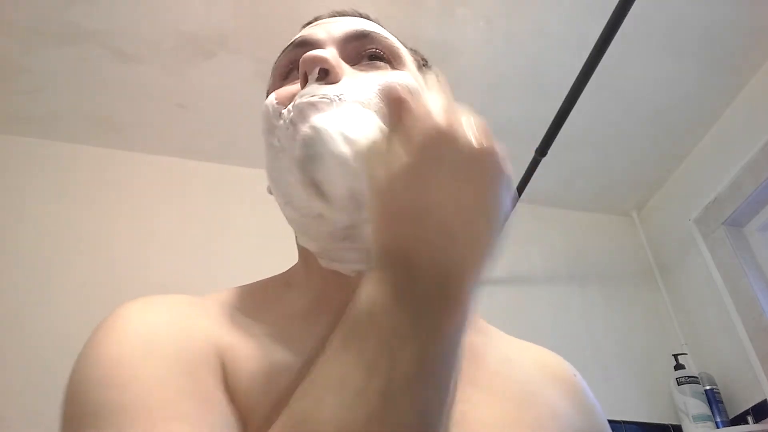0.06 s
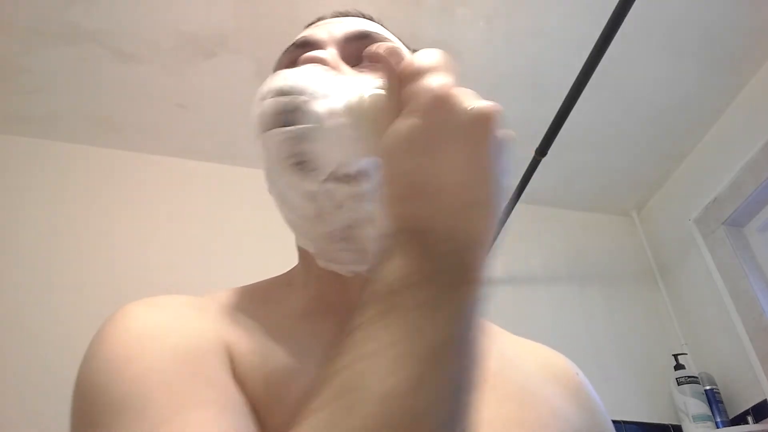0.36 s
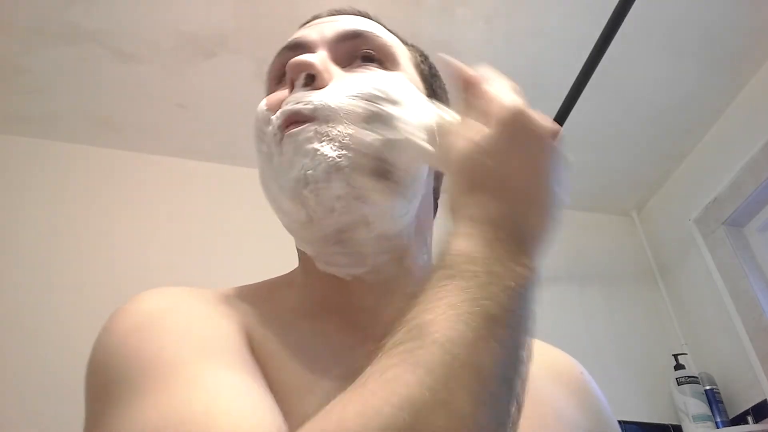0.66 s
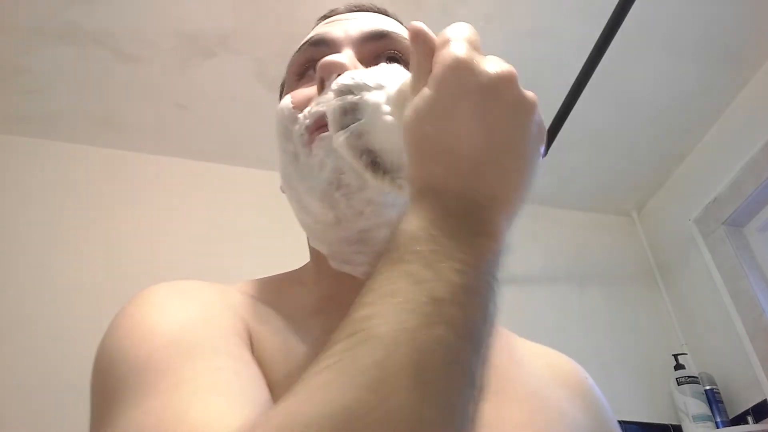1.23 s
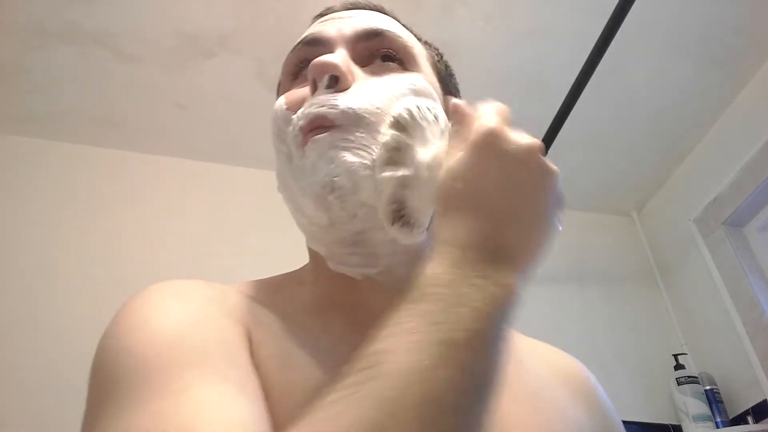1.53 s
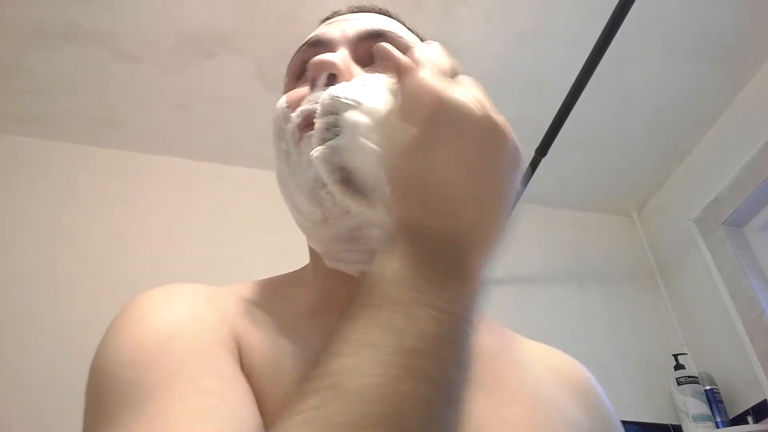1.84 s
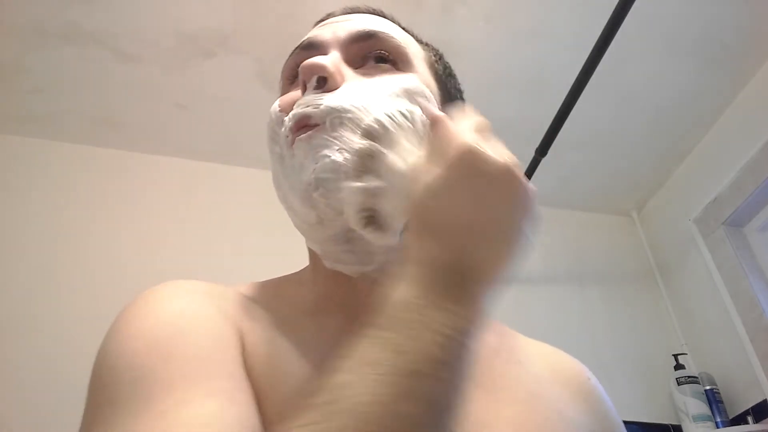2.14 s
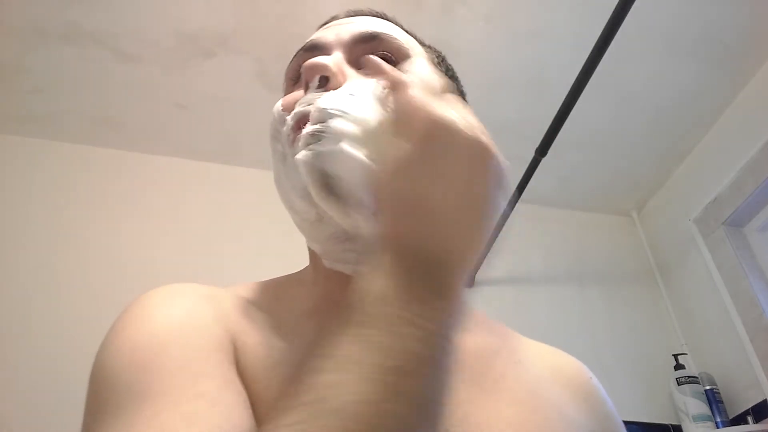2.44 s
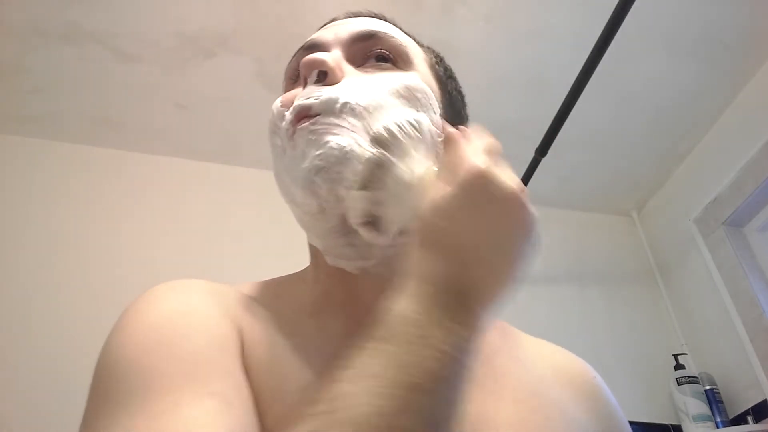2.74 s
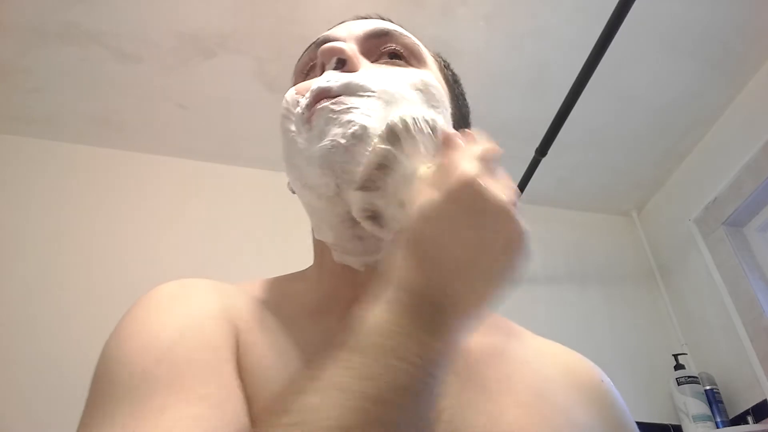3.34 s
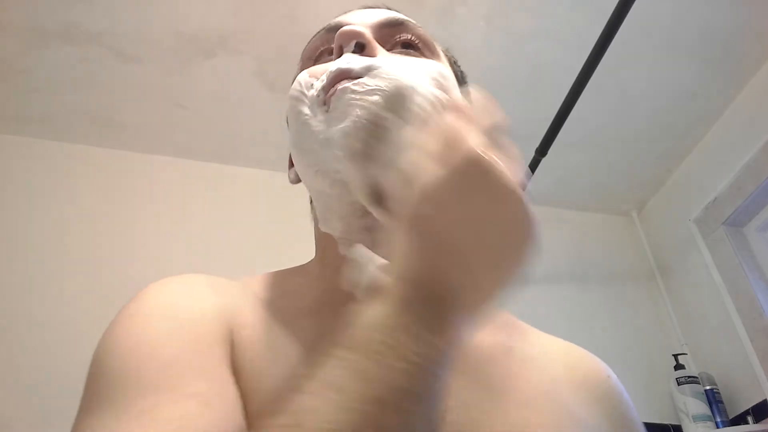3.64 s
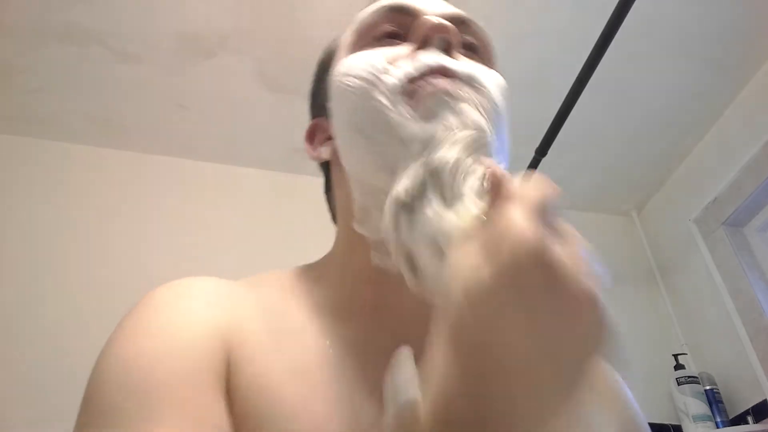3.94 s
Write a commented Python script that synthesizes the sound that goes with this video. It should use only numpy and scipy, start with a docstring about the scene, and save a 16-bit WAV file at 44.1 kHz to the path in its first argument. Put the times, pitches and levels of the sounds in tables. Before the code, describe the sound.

Rapid, hissing swishes of a shaving brush work wet foam over a cheek, with tiny bubble pops and soft pats. Late on there is one brief, juddering bump. The small bathroom rings faintly over a quiet hiss and fan drone.

```python
"""In a small bathroom, a shaving brush scrubs lather over a stubbly cheek, about a dozen swishes a second.
The bristles hiss as they flick over the stubble, the foam squelches and crackles as its bubbles burst,
and pockets of air plop. Near the end comes a dull, juddering bump. The room rings faintly around
everything, over a quiet hiss and the drone of a fan."""
import sys
import numpy as np
from scipy import signal
from scipy.fft import rfft, irfft
from scipy.io import wavfile

SR = 44100
rng = np.random.default_rng(int(sys.argv[2]) if len(sys.argv) > 2 else 0)


def unload_wav(signal):
    """Save mono or channel-first audio to the path in sys.argv[1] as 16-bit WAV at rate SR, clipped to [-1, 1]."""
    wavfile.write(
        sys.argv[1],
        SR,
        np.round(np.clip(np.atleast_2d(signal).T, -1, 1) * 32767).astype(np.int16),
    )


N = 176400
TIME = np.arange(N) / SR

# strokes of the brush: peak t/s, rise/s, fall/s, hiss level/dB, squelch level/dB, brightness/dB
BRUSH_SWISHES = [(0.016, 0.069, 0.073, -71.5, -75.5, -4), (0.172, 0.017, 0.022, -62.5, -64.5, -1),
                 (0.242, 0.038, 0.082, -66, -71, -9), (0.359, 0.012, 0.033, -69, -76, 8),
                 (0.409, 0.032, 0.039, -64, -68.5, 0), (0.498, 0.024, 0.053, -66, -73, -10),
                 (0.607, 0.011, 0.02, -74, -75, -7), (0.682, 0.046, 0.017, -59.5, -64, -1.5),
                 (0.744, 0.033, 0.046, -56.5, -59, -9), (0.862, 0.039, 0.076, -67, -63, -6),
                 (1.008, 0.035, 0.026, -66.5, -62, -9.5), (1.134, 0.031, 0.04, -64.5, -57.5, -3),
                 (1.22, 0.036, 0.049, -67, -63.5, -3), (1.328, 0.027, 0.038, -60.5, -60.5, -9),
                 (1.401, 0.024, 0.036, -65, -59.5, -6), (1.43, 0.018, 0.031, -73, -61.5, 1),
                 (1.526, 0.028, 0.011, -54.5, -54, -8), (1.598, 0.1, 0.054, -63, -61, -6),
                 (1.711, 0.031, 0.044, -54, -57, -3.5), (1.801, 0.053, 0.028, -59, -59.5, 0),
                 (1.915, 0.043, 0.052, -57, -61.5, 2), (1.982, 0.0052, 0.035, -57.5, -55, 8),
                 (2.024, 0.036, 0.012, -67.5, -64, -7), (2.105, 0.046, 0.059, -57, -56, 0.5),
                 (2.181, 0.0043, 0.034, -56.5, -57, 8.5), (2.302, 0.039, 0.045, -61.5, -56, -2.5),
                 (2.369, 0.005, 0.067, -60.5, -61, 0), (2.51, 0.035, 0.021, -60, -57, 2.5),
                 (2.611, 0.05, 0.022, -59.5, -61.5, -3), (2.655, 0.005, 0.051, -57.5, -64, 5),
                 (2.695, 0.013, 0.035, -55, -53.5, -2), (2.805, 0.068, 0.026, -61, -59.5, -0.5),
                 (2.92, 0.046, 0.024, -56, -57.5, -2), (2.985, 0.006, 0.06, -54.5, -55, 2.5),
                 (3.09, 0.018, 0.033, -52.5, -55.5, 0), (3.122, 0.019, 0.034, -55, -54, -3.5),
                 (3.178, 0.004, 0.055, -54, -55.5, 0.5), (3.257, 0.0089, 0.008, -60, -60.5, 8),
                 (3.331, 0.054, 0.029, -55.5, -58, -4.5), (3.392, 0.012, 0.06, -48.5, -44, -1.5),
                 (3.483, 0.018, 0.016, -49.5, -48.5, -2), (3.508, 0.011, 0.016, -40, -41.5, -2),
                 (3.608, 0.014, 0.018, -52, -55.5, -5.5), (3.709, 0.041, 0.01, -50, -53.5, -3),
                 (3.767, 0.032, 0.043, -57.5, -56.5, -6), (3.894, 0.048, 0.028, -59.5, -67.5, 0),
                 (3.966, 0.0068, 0.039, -64, -66.5, -16)]


def bristles():
    """Bristle tips flick over stubble, so many tiny clicks that they hiss, over a faint high hiss."""
    hiss_spectrum = [(700,-16),(1400,-16),(1800,1.5),(2200,-6),(2700,0),(4300,1),(5400,0),(6400,-5),(7400,-19),(10000,-21),(12500,-42),(16000,-35)]  # tone of the bristles: f/Hz, level/dB
    high_hiss_spectrum = [(3000,2),(5000,-12),(7500,-1),(10000,-1),(12500,-9),(16000,-2.5)]  # tone of the high background hiss: f/Hz, level/dB
    split_hz, flutter_db, linger_s = 3570, 1.5, 0.77
    clicks = colour(stereo_grains(per_s=9000, spread_db=3, shared=0.19), hiss_spectrum)
    lows = signal.sosfiltfilt(signal.butter(2, split_hz, fs=SR, output="sos"), clicks)
    highs = clicks - lows
    # a brighter swish has less of the lows and more of the highs
    low_level = swells([(s, rise, fall, db - bright / 2)
                        for s, rise, fall, db, _, bright in BRUSH_SWISHES])
    high_level = swells([(s, rise, fall, db + bright / 2)
                         for s, rise, fall, db, _, bright in BRUSH_SWISHES])
    # a faint high background hiss slowly rises and fades with the brushing's loudness
    hold = np.exp(-1 / (linger_s * SR))
    high_hiss_level = signal.lfilter([1 - hold], [1, -hold], (low_level + high_level) / 2)
    high_hiss = high_hiss_level * colour(rng.standard_normal((2, N)), high_hiss_spectrum)
    flutter = from_db(flutter_db * drift(rate_hz=69))
    return flutter * (low_level * lows + high_level * highs) + from_db(-13) * high_hiss


def foam_squelch():
    """Squeezed lather squelches as clumps of bubbles collapse."""
    spectrum = [(60,-26),(120,-5),(190,-4),(320,-4.5),(470,8),(570,-2),(680,4.5),(860,2.5),(1100,3),(1500,-5.5),(2200,-24),(4000,-29.5)]  # tone of the squelch: f/Hz, level/dB
    gain_db, flutter_db = 0.5, 1
    level = swells([(s, rise, fall, db) for s, rise, fall, _, db, _ in BRUSH_SWISHES])
    bubbles = colour(stereo_grains(per_s=2500, spread_db=2.5, shared=0.64), spectrum)
    return level * from_db(gain_db + flutter_db * drift(rate_hz=44)) * bubbles


def foam_crackle():
    """Small bubbles tick one by one as each swish crushes them."""
    spectrum = [(600,-18),(1500,-7),(3000,-1),(5500,-3.5),(6600,-6.5),(7500,-20),(16000,-43)]  # tone of the ticks: f/Hz, level/dB
    level = swells([(s, rise, fall, db) for s, rise, fall, db, _, _ in BRUSH_SWISHES])
    return from_db(-10) * level * colour(grains(per_s=350, spread_db=2), spectrum)


def foam_hollows():
    """Each swish sets two hollows in the foam singing briefly, each at a random pitch."""
    typical_hz, spread_octaves, half_width_octaves, gain_db = 2200, 0.359, 0.027, -11.5
    out, t = np.zeros(N), TIME[:SR // 4]
    for s, rise, fall, db, _, bright in BRUSH_SWISHES:
        start = max(s - 2 * rise, 0)
        from_peak = start + t - s
        swell = np.exp(-(from_peak / np.where(from_peak < 0, rise, fall)) ** 2)
        for hz in typical_hz * 2 ** (spread_octaves * rng.normal(size=2)):
            edges_hz = [hz * 2 ** -half_width_octaves, hz * 2 ** half_width_octaves]
            note = rms_one(filtered(rng.standard_normal(len(t)), "band", edges_hz, order=1))
            add(out, start, from_db(db + gain_db - bright / 2) * note * swell)
    return out


def air_plops():
    """An air pocket opens and rings briefly and roughly, with overtones that differ each time."""
    pockets = [(0.145,-61,502,.003),(.752,-49,502,0.0074),(1.0,-77,460,0.0027),(1.127,-43,473,.006),(1.214,-68,490,0.0026),(1.319,-51.5,500,0.0023),(1.516,-46.5,500,0.0061),(1.723,-35.5,457,0.0021),(1.776,-43,499,0.0038),(1.908,-37,473,0.0018),(1.976,-44,419,0.00069),(2.028,-52,488,0.0018),(2.112,-46.5,475,0.0048),(2.177,-43,467,.002),(2.293,-52,496,0.0033),(2.371,-42,456,.004),(2.495,-44,480,0.0077),(2.696,-49,443,0.0013),(2.98,-49.5,430,0.0007),(3.177,-39.5,492,0.0017),(3.334,-50,481,0.0012),(3.604,-39.5,494,0.002),(3.763,-43,500,0.006)]  # air pockets under the brush: t/s, level/dB, f/Hz, fade-in/s
    tones = [(.72,-19,0.013),(0.998,3.5,0.064),(1.36,1,0.035),(1.81,-8.5,.05),(2.5,-27,0.016)]  # how a pocket rings: multiple of its pitch, level/dB, ring time/s
    roughness_db = 4.5
    out = np.zeros(N)
    for s, db, hz, fade_in_s in pockets:
        plop = 0
        for multiple, tone_db, ring_s in tones:
            detune = 1 + 0.13 * (multiple - 1) * rng.normal()
            plop += ring(hz * multiple * detune, db + tone_db + rng.normal(), ring_s)
        fade_in = 1 - np.exp(-TIME[:len(plop)] / fade_in_s)
        boost = from_db(350 * fade_in_s)  # makes up for what a slow fade-in takes away
        add(out, s, plop * fade_in * boost)
    return out * from_db(roughness_db * (drift(rate_hz=81) - 1))


def bubble_snaps():
    """A larger bubble bursts with a short, bright snap."""
    bursts = [(.148,-64,1290),(0.237,-52,2430),(1.113,-60,1100),(1.132,-55.5,2740),(1.32,-64,1110),(1.722,-45.5,860),(1.909,-49,905),(1.978,-51.5,2200),(2.179,-58,870),(2.366,-55,4300),(2.653,-59,3380),(2.982,-58,2950),(3.602,-49,3300),(3.959,-49.5,1440)]  # single bursting bubbles: t/s, level/dB, f/Hz
    decay_s, half_width_octaves = 0.007, 0.48
    out, t = np.zeros(N), TIME[:SR // 10]
    fade = np.exp(-t / decay_s)
    for s, db, hz in bursts:
        edges_hz = [hz * 2 ** -half_width_octaves, hz * 2 ** half_width_octaves]
        snap = filtered(rng.standard_normal(len(t)) * fade, "band", edges_hz, order=2)
        add(out, s, from_db(db) * snap * np.linalg.norm(fade) / np.linalg.norm(snap))
    return out


def hollow_note():
    """A soft, wavering note comes and goes under the brush in the first second."""
    notes = [(.535,.04,0.054,-68),(.612,0.022,0.02,-64.5),(.76,.025,0.013,-60)]  # swells of the note: peak t/s, rise/s, fall/s, level/dB
    pitch_hz, waver_hz = 491, 15
    hz = pitch_hz + waver_hz * drift(rate_hz=40)
    return swells(notes) * np.sin(2 * np.pi * np.cumsum(hz) / SR)


def cheek_pats():
    """The brush pats the cheek, which answers with a soft, low thud."""
    pats = [(1.143,-69),(1.977,-52.5),(2.003,-51),(2.179,-43.5),(2.204,-61),(2.226,-61),(2.285,-57),(2.318,-51),(2.695,-56),(2.982,-53),(3.18,-56)]  # pats of the brush: t/s, level/dB
    tones = [(190,-5.5,0.21),(256,-4.5,0.11)]  # how the cheek rings: f/Hz, level/dB, ring time/s
    return knocks(pats, tones)


def bump():
    """A quick run of dull jolts over a rubbing rumble."""
    jolts = [(3.382,-38),(3.392,-27.5),(3.406,-32),(3.421,-23.5),(3.456,-36),(3.474,-30.5),(3.503,-51),(3.521,-64),(3.553,-58),(3.81,-54.5)]  # jolts of the bump: t/s, level/dB
    tones = [(63,-20.5,0.32),(121.7,-5,0.24),(187.7,-3.5,0.076),(218.2,-4,0.133),(265,-14,0.023),(380,-10.5,0.095)]  # how a jolt rings: f/Hz, level/dB, ring time/s
    rumbles = [(3.392,0.008,0.091,-37.5),(3.49,0.02,0.076,-45.5)]  # swells of the rumble: peak t/s, rise/s, fall/s, level/dB
    spectrum = [(30,-17),(85,-22),(130,13),(250,-1),(320,-8),(420,-4.5),(600,-5),(1000,-14),(2000,-63)]  # tone of the rumble: f/Hz, level/dB
    return knocks(jolts, tones) + swells(rumbles) * colour(rng.standard_normal(N), spectrum)


def bathroom(sound):
    """Sound bounces off the walls, differently for each ear, and a few notes ring on between them."""
    room_notes = [(116.2,-2,0.69),(207,-6.5,0.18),(390,-21,0.22),(477,-0.5,0.12),(500,1.5,0.37),(640,-9,0.18),(826,-23,0.3),(847.7,5,0.12)]  # standing waves between the walls: f/Hz, level/dB, ring time/s
    scatter_s, scatter_db, tail_s, tail_db = 0.00053, -2, 0.35, -6.5
    t = TIME[:SR // 2]

    def echoes(fade, above_hz, order):
        """A dense cloud of echoes: fading noise with the bass taken out."""
        noise = rng.standard_normal((2, len(t)))
        return filtered(noise * fade / np.linalg.norm(fade), "high", above_hz, order)

    direct = t == 0
    scatter = echoes(np.exp(-t / scatter_s), above_hz=500, order=2)  # off the nearest walls
    early_spectrum = rfft(direct + from_db(scatter_db) * scatter)
    early = irfft(early_spectrum / np.abs(early_spectrum), len(t)) * (t < 0.1)  # no pitch is favoured
    tail_fade = from_db(-60 * t / tail_s) * (1 - np.exp(-t / 0.01))
    response = early + from_db(tail_db) * echoes(tail_fade, above_hz=300, order=1)
    for hz, db, ring_s in room_notes:
        # scaled so that db is the gain at the note's own pitch
        response += np.gradient(ring(hz, db, ring_s)) * np.log(1000) / (np.pi * hz * ring_s)
    return signal.fftconvolve(sound, response, axes=1)[:, :N]


def room_tone():
    """A faint, steady hiss and a fan's hollow drone, which is noise in a narrow band."""
    spectrum = [(20,-9),(45,-3.5),(85,-8.5),(125,0),(200,-5.5),(340,-11.5),(480,-9),(700,0),(1200,-6),(3000,-8.5),(6000,-12.5),(9000,-12),(16000,-17.5)]  # tone of the quiet room: f/Hz, level/dB
    hiss_db, fan_db, fan_hz, fan_width_hz = -71, -76.5, 500, 23
    hz = np.arange(N // 2 + 1) * SR / N
    fan_band = 1 / (1 + (2 * (hz - fan_hz) / fan_width_hz) ** 2)
    drone = rms_one(irfft(rfft(rng.standard_normal(N)) * fan_band, N))
    shared_lows = filtered(rng.standard_normal(N), "low", 500, order=1)  # alike at both ears
    hiss = colour(rng.standard_normal((2, N)) + 2.4 * shared_lows, spectrum)
    return from_db(hiss_db) * hiss + from_db(fan_db) * drone


def knocks(hits, tones, softness_s=0.0026):
    """Soft blows on a body, each setting its tones ringing a little differently."""
    out = np.zeros(N)
    fade_in = 1 - np.exp(-(TIME[:SR // 2] / softness_s) ** 2)
    for s, db in hits:
        ringing = sum(ring(hz, db + tone_db + rng.normal(), ring_s) for hz, tone_db, ring_s in tones)
        add(out, s, fade_in * ringing)
    return out


def ring(hz, db, ring_s):
    """Half a second of a pure tone that fades by 60 dB in its ring time."""
    t = TIME[:SR // 2]
    return from_db(db - 60 * t / ring_s) * np.sin(2 * np.pi * hz * t)


def grains(per_s, spread_db):
    """Random clicks of uneven size."""
    sizes = from_db(spread_db * np.minimum(rng.exponential(1, N), 5))
    signs = rng.choice([-1, 1], N)
    return sizes * signs * (rng.random(N) < per_s / SR)


def stereo_grains(per_s, spread_db, shared):
    """Three streams of clicks: one for each ear, and one for both that has the shared part of the power."""
    both, left, right = (grains(per_s, spread_db) for _ in range(3))
    return np.sqrt(shared) * both + np.sqrt(1 - shared) * np.array([left, right])


def swells(strokes):
    """Loudness over time for strokes that swell and die away."""
    t = TIME[::20]
    power = np.zeros(len(t))
    for peak_s, rise, fall, db in strokes:
        from_peak = t - peak_s
        drop = np.where(from_peak < 0, (from_peak / rise) ** 2, np.abs(from_peak / fall) ** 1.72)
        power += from_db(db) ** 2 * np.exp(-2 * drop)
    return np.interp(TIME, t, np.sqrt(power))


def drift(rate_hz):
    """A smooth random wander, about 1 in size; a higher rate wanders faster."""
    step, warm_up = 40, 2000
    hold = np.exp(-2 * np.pi * rate_hz * step / SR)
    noise = rng.standard_normal(N // step + warm_up + 2)
    wander = signal.lfilter([1], [1, -2 * hold, hold * hold], noise)[warm_up:]
    return np.interp(np.arange(N) / step, np.arange(len(wander)), rms_one(wander))


def colour(x, spectrum):
    """Shape the tone of a sound with a (Hz, dB) curve, then bring its average level to 1."""
    return rms_one(irfft(rfft(x) * from_db(curve_db(spectrum)), N))


def curve_db(points):
    """Join (Hz, dB) points into a level for every frequency."""
    hz, db = np.transpose(points)
    return np.interp(np.log(np.arange(N // 2 + 1) * SR / N + 1), np.log(hz), db)


def filtered(x, kind, hz, order):
    """Keep the lows, the highs or one band of a sound."""
    return signal.sosfilt(signal.butter(order, hz, kind, fs=SR, output="sos"), x)


def from_db(db):
    """Turn decibels into a multiplier."""
    return 10 ** (np.asarray(db) / 20)


def rms_one(x):
    """Bring the average (rms) level to 1."""
    return x / np.sqrt(np.mean(x ** 2) + 1e-20)


def add(out, start_s, sound):
    """Mix a sound in at a given time."""
    i = int(start_s * SR)
    out[i:i + len(sound)] += sound[:N - i]


def scene():
    """The brush and the bump in the bathroom, a little to the left, over the quiet room."""
    left_lead = [(100,2),(350,-1),(600,2),(860,9),(1030,-1),(1350,10.5),(1850,0),(2650,-1),(3500,3.5),(4100,3.5),(4700,0.5),(6000,3.5),(6900,-5),(8000,-1),(10000,-3),(12000,-0.5)]  # how much more the left ear gets: f/Hz, left minus right level/dB
    lather = bristles() + foam_crackle() + foam_hollows() + foam_squelch()
    lather = lather + air_plops() + bubble_snaps() + hollow_note()
    in_room = bathroom(lather + cheek_pats() + bump())
    ear_gains = from_db(curve_db(left_lead) * np.array([[0.5], [-0.5]]))
    return irfft(rfft(in_room) * ear_gains, N) + room_tone()


def record(dry):
    """The very highest treble is cut off steeply."""
    cutoff_hz = 15800
    return signal.sosfilt(signal.ellip(12, 0.1, 80, cutoff_hz, fs=SR, output="sos"), dry)


dry = scene()
out = record(dry)
unload_wav(out)
```